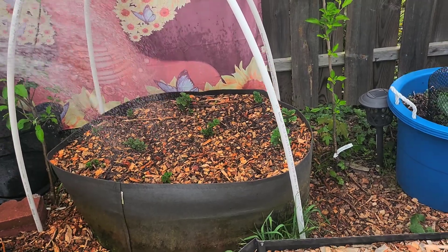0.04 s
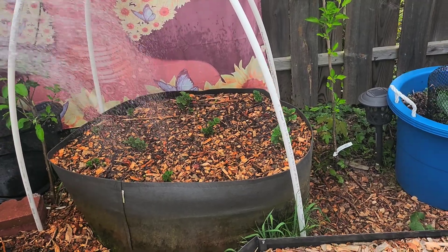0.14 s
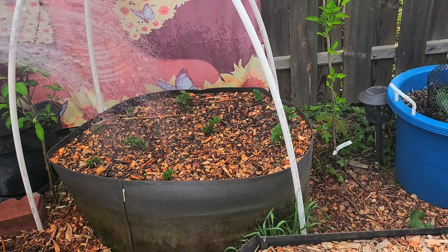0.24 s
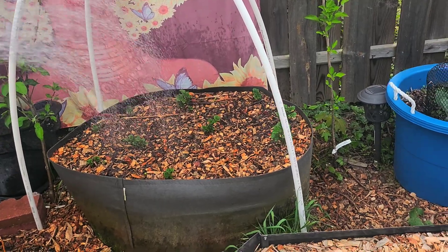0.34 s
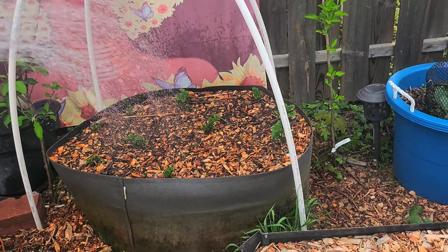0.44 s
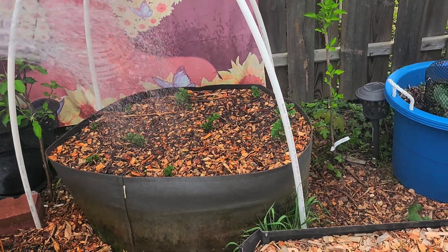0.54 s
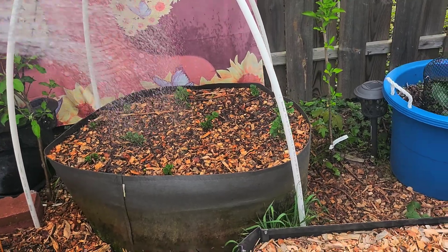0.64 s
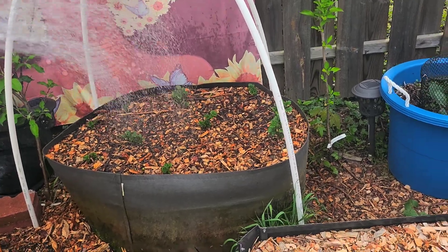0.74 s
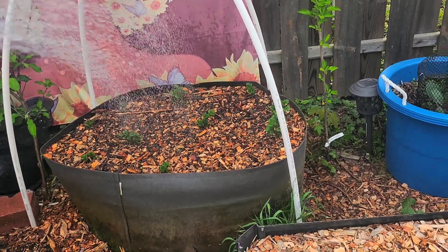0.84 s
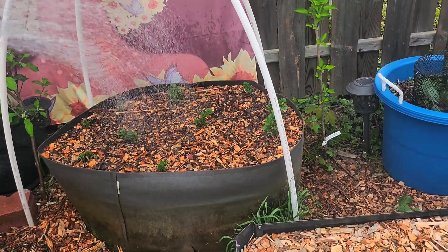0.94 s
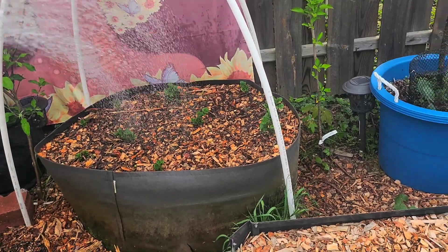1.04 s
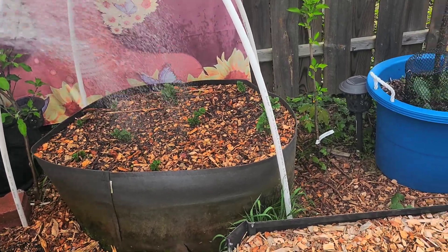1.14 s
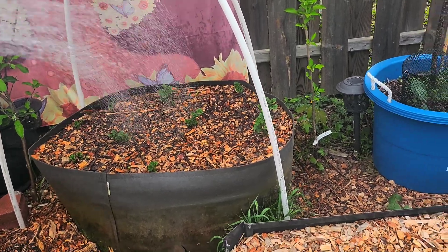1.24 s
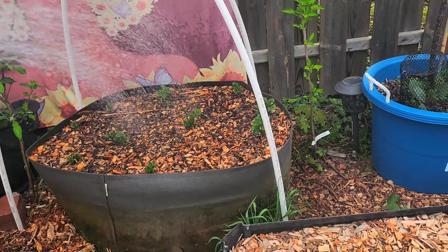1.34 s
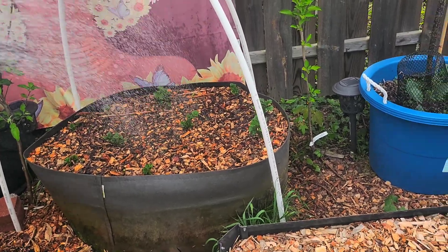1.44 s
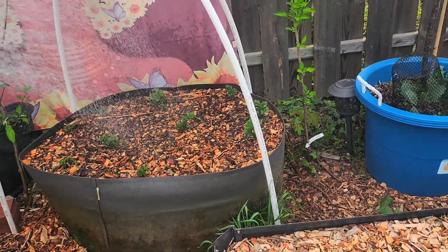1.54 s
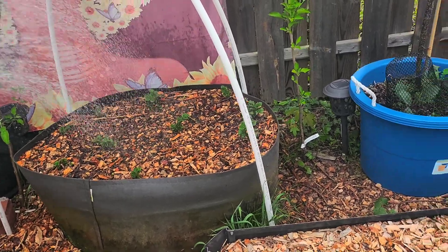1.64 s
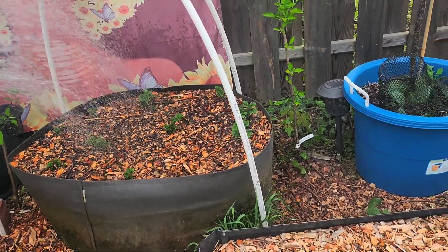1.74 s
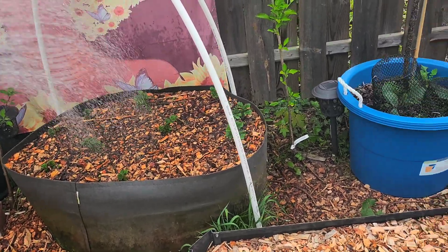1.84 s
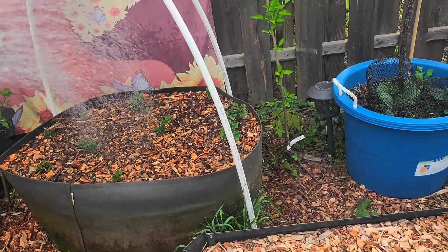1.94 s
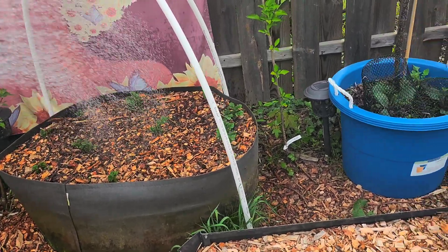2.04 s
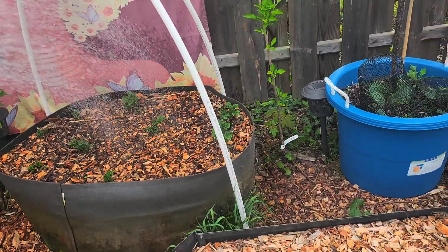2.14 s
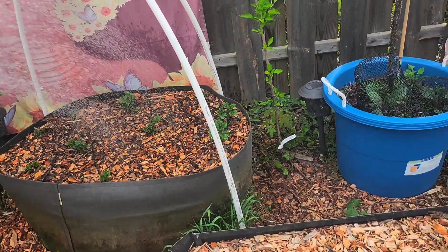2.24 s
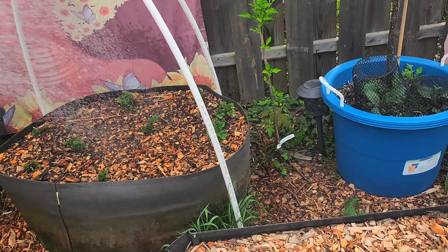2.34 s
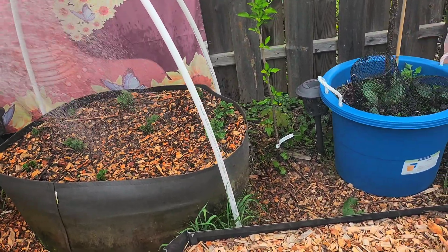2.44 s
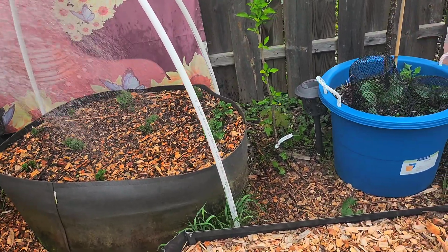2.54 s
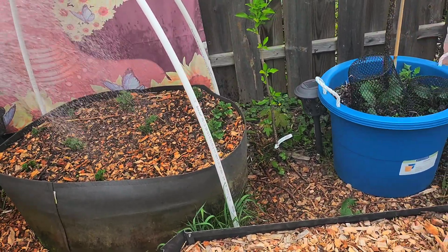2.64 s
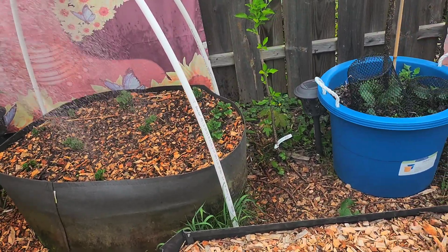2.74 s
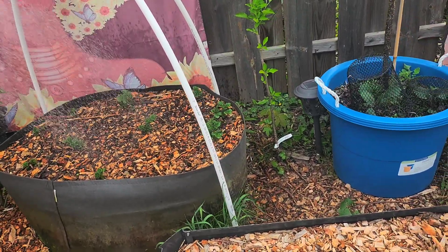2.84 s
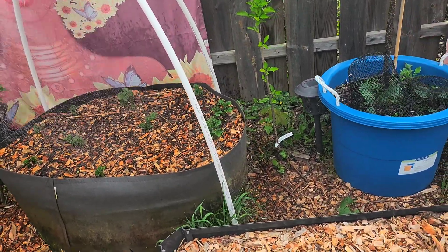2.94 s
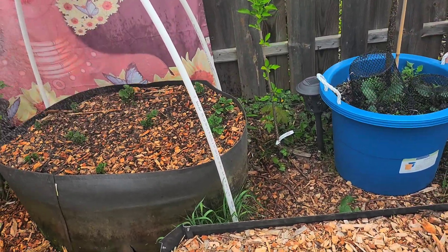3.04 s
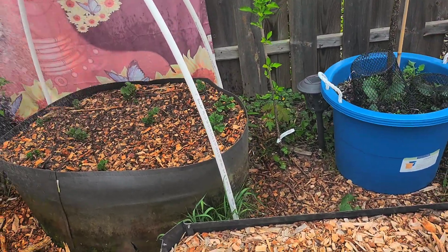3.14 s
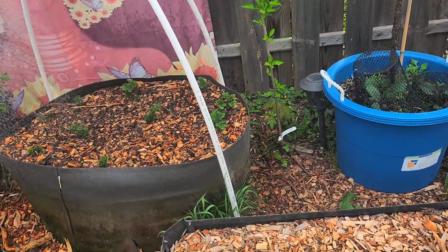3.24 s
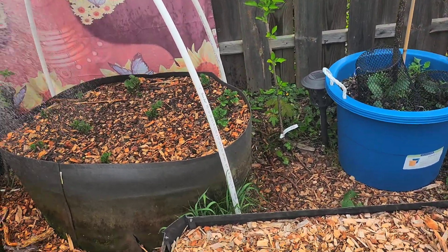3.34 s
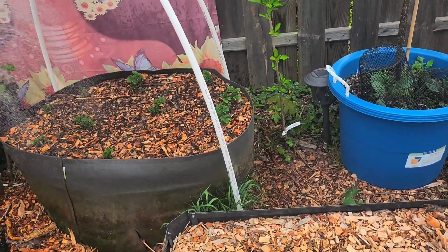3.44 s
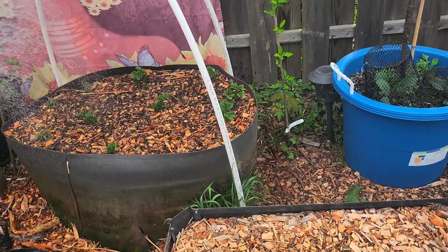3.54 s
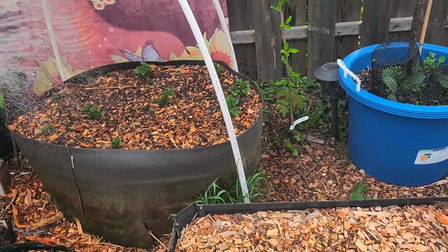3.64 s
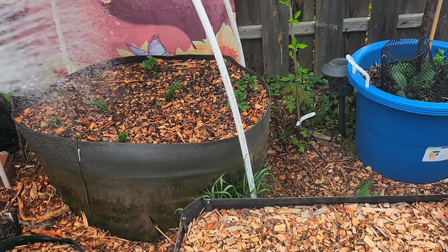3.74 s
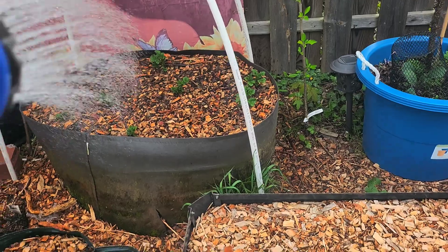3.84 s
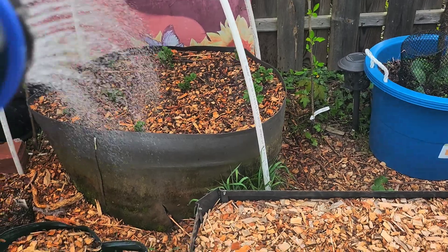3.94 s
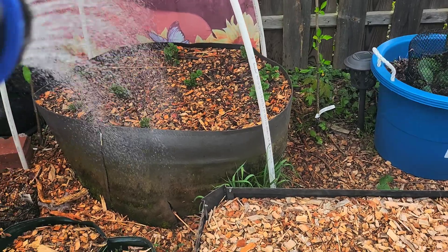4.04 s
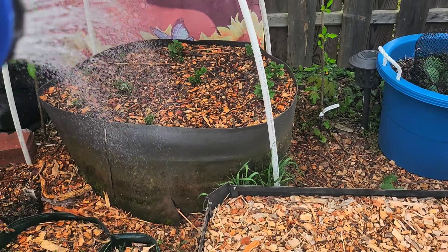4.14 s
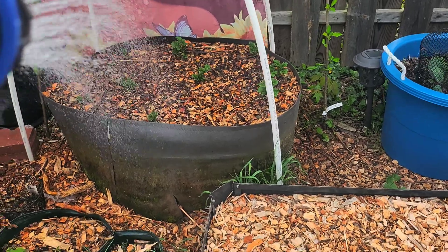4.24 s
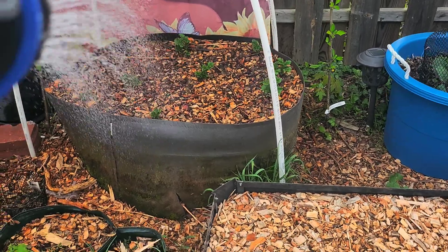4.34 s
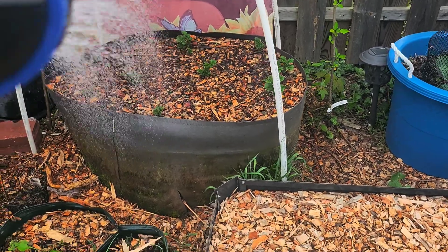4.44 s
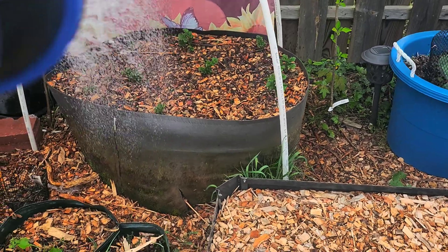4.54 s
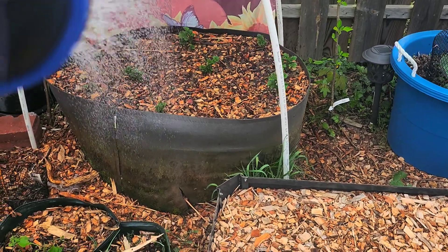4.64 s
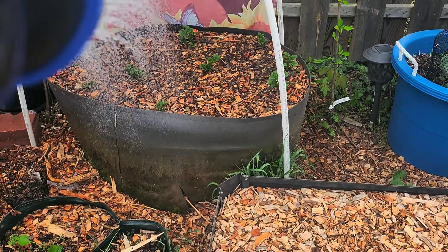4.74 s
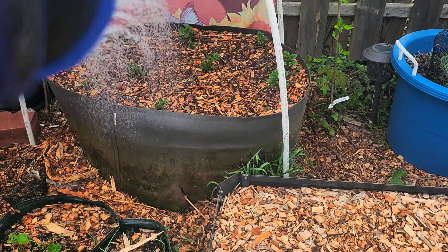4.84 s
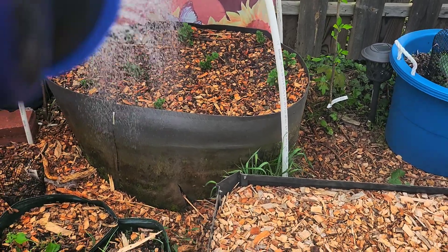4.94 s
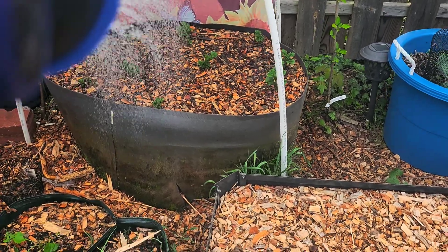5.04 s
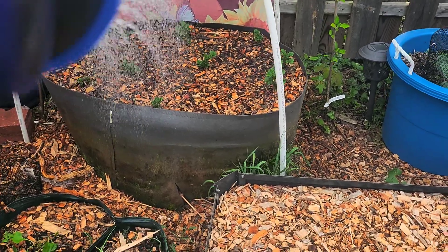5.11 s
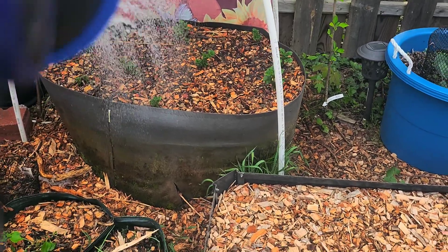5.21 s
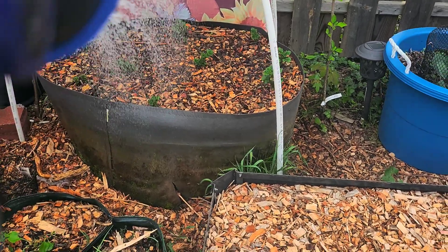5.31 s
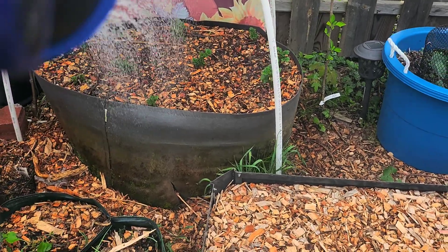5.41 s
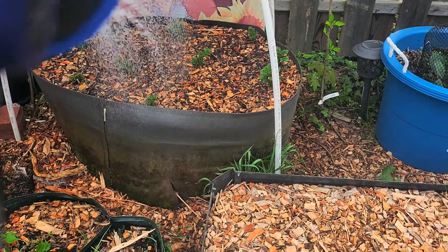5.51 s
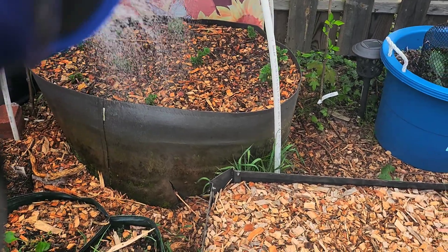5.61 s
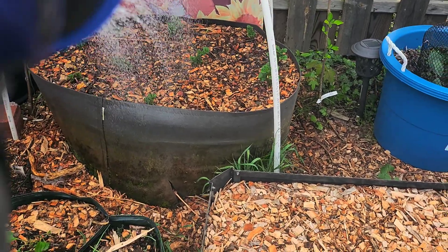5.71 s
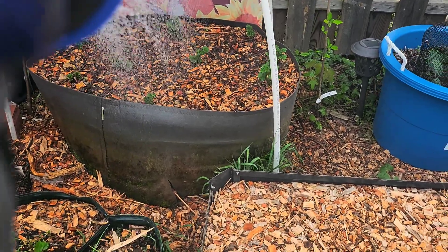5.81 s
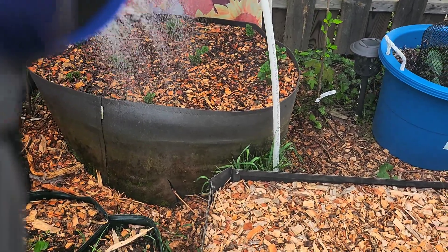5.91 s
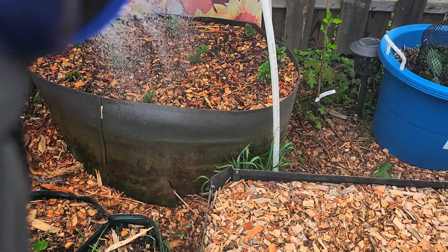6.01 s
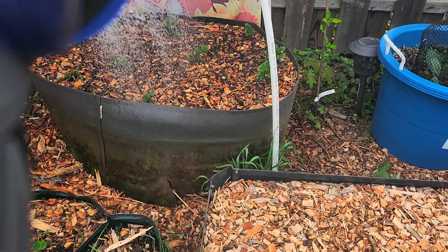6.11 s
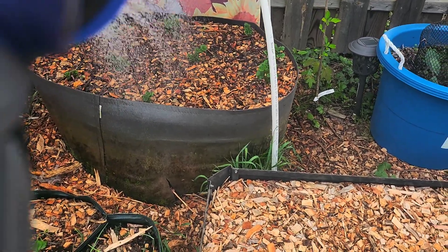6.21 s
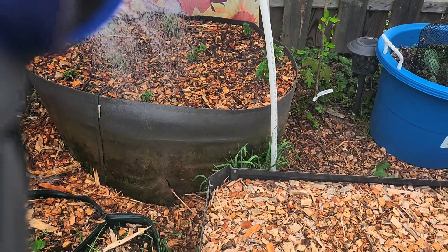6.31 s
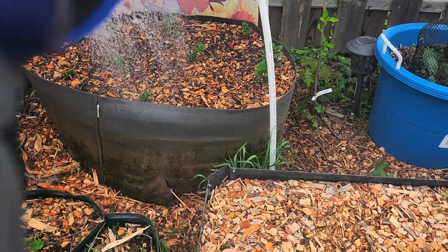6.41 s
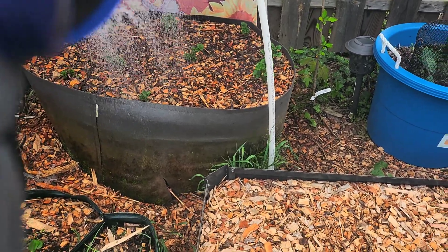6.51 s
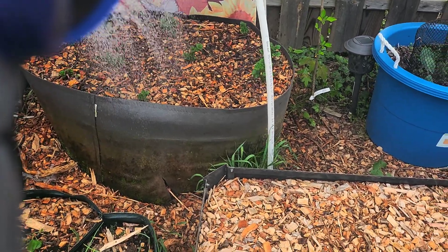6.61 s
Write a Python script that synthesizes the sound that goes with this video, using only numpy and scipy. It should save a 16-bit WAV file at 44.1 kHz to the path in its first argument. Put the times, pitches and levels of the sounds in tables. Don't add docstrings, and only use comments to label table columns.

```python
import sys
import numpy as np
from scipy import signal
from scipy.fft import rfft, irfft, next_fast_len
from scipy.io import wavfile
from scipy.ndimage import uniform_filter1d, map_coordinates

SR = 44100
rng = np.random.default_rng(int(sys.argv[2]) if len(sys.argv) > 2 else 0)


def store_pcm(level_fs):
    pcm = np.round(np.clip(level_fs, -1, 1) * 32767).astype(np.int16)
    wavfile.write(sys.argv[1], SR, np.atleast_2d(pcm).T)


def boost(x):
    u = np.asarray(x, float) / 20
    return 10 ** u


N = 294147

# time in seconds, level in dB.
JET_STRENGTH = [(0, -0.1), (.5, 0.34), (3, 0.05), (3.9, 0.8), (4.6, 0), (5.6, 0.6), (6, 0), (6.67, 2.5)]
# centre in seconds, change in dB.
TRIGGER_SLIPS = [
    (1.02, -0.7),
    (2.8, 0.6),
    (3.4, -0.5),
    (3.78, -0.5),
    (4.25, -.9),
    (6.35, -1.5),
]
# start in seconds, end in seconds.
HAND_MOVES = [
    (.35, 0.51),
    (1.1, 2.6),
    (2.62, 2.9),
    (3.66, 3.97),
    (4.25, 4.5),
]
# frequency in Hz, level in dB.
JET_COLOUR_LEFT = [(2500, -26.0), (3500, -32.0), (4500, -9.0), (6000, -5.0), (7500, 1.43), (9000, -3.5),
                   (11000, 4.5), (13000, -0.5), (14500, -3.5), (15700, 4.0)]
# frequency in Hz, level in dB.
JET_COLOUR_RIGHT = [(2500, -17.4), (3500, -15.0), (4500, -15.9), (6000, -19.5), (7500, -6.2), (9000, -17.4),
                    (11000, -13.9), (13000, -9.9), (14500, -12.9), (15700, -7.2)]
# delay in ms, pressure gain.
PATHS_TO_LEFT = [
    [(-0.011, 0.25), (0.0, 0.48), (0.079, 0.13), (0.181, -0.19), (0.324, 0.16), (0.377, 0.27),
     (0.619, 0.11), (0.666, 0.08)],
    [(0.0, 0.66), (0.037, -0.11), (0.192, -0.17), (0.335, 0.08), (0.396, 0.2), (0.816, 0.12),
     (1.015, -0.11), (1.203, 0.07)],
    [(0.0, 0.72), (0.071, 0.13), (0.183, -0.22), (0.287, -0.11), (0.44, -0.15), (0.547, 0.14), (0.618, 0.1),
     (0.707, -0.11)],
    [(0.0, 0.65), (0.057, 0.12), (0.136, 0.12), (0.365, -0.22), (0.684, 0.05), (0.777, -0.1),
     (0.895, -0.05), (0.997, 0.07)],
    [(0.0, 0.99), (0.035, 0.44), (0.086, 0.24), (0.158, -0.2), (0.311, 0.2), (0.388, -0.15), (0.618, -0.13),
     (0.827, 0.17)],
    [(0.0, 1.14), (0.144, -0.54), (0.29, 0.16), (0.384, -0.33), (0.436, -0.15), (0.661, 0.21),
     (0.697, 0.34), (1.165, 0.11)],
]
# delay in ms, pressure gain.
PATHS_TO_RIGHT = [
    [(0.282, -0.3), (0.411, -0.38), (0.509, 0.77), (0.595, -0.37), (0.668, -0.44), (0.858, 0.22),
     (0.987, 0.38), (1.057, 0.2), (1.51, 0.37), (1.747, 0.17)],
    [(0.271, -0.18), (0.349, 0.28), (0.442, -0.23), (0.56, -0.78), (0.605, -0.66), (0.672, -0.5),
     (0.706, 0.25), (0.808, -0.25), (1.025, -0.32), (1.086, -0.24)],
    [(0.246, 0.15), (0.296, -0.28), (0.361, 0.4), (0.485, 0.21), (0.521, 0.54), (0.636, 0.59),
     (0.648, -0.39), (0.76, -0.33), (0.812, -0.76), (1.024, -0.33)],
    [(0.071, 0.17), (0.117, 0.36), (0.361, 0.45), (0.439, -0.28), (0.517, 0.8), (0.604, 0.39),
     (0.718, 0.28), (0.876, -0.11), (0.993, -0.16), (1.531, 0.14)],
    [(-0.016, -0.28), (0.413, -0.43), (0.681, -0.13), (0.789, -0.06), (1.015, 0.39), (1.156, -0.42),
     (1.243, -0.22), (1.424, -0.43), (1.704, 0.45), (2.393, 0.19)],
    [(0.45, -0.3), (0.526, 0.2), (0.71, 0.23), (0.824, 0.22), (0.889, -0.16), (1.038, 0.28), (1.211, 0.39),
     (1.269, 0.4), (1.456, 0.16), (1.546, 0.2)],
]
# frequency in Hz, level in dB.
MIST_COLOUR = [(2500, -30), (3500, -10), (4400, 3), (5100, -5), (6000, -6), (7500, 0), (9000, -3),
               (13000, -3), (15700, 0)]
# time in seconds, level in dB.
PATTER_LEVEL = [(0, -57), (.67, -58), (1.37, -54.5), (1.8, -57), (3.2, -58), (4, -53.5), (4.4, -56),
                (4.83, -54.5), (6.67, -55)]
# frequency in Hz, level in dB.
MULCH_COLOUR = [(260, -36), (450, 3.5), (640, -5), (950, -0.5), (1280, 1), (1600, 1), (1950, 3), (2300, -2),
                (2650, -6.5), (3080, -2), (3400, -15), (4200, -3.5), (6000, -94)]
# frequency in Hz, lag in radians.
PORT_LAG = [(100, .15), (500, .8), (1000, 2), (1650, 3.2), (2100, 6), (3300, 6.8)]
# time in seconds, level in dB.
TUB_SPLASH = [(0, -68), (3.8, -80), (4.05, -60.5), (4.7, -64), (5.2, -63), (5.6, -81), (6.67, -78)]
# start in seconds, peak in dB, ring in Hz, ring time in seconds, thump in dB.
GRIP_TICKS = [
    (.832, -46, 1810, 0.018, -20),
    (1.180, -37, 1190, 0.016, -20),
    (1.2224, -23, 1360, 0.0021, -5),
    (1.297, -34, 517, 0.014, -17),
    (1.309, -33, 666, 0.011, -1),
    (1.37, -36.5, 900, 0.0085, -10),
    (1.39, -54, 1880, 0.012, -20),
    (1.543, -35, 497, 0.0088, -16),
]
# start in seconds, length in seconds, pitch in Hz, level in dB.
WHISTLES = [
    (2.855, .15, 3170, -56),
    (2.99, .06, 2960, -61),
    (3.81, .17, 3150, -57),
    (5.215, .15, 3210, -55),
    (6.05, .19, 3130, -55),
]
# time in seconds, level in dB.
ENGINE_LEVEL = [(0, -53), (.4, -50), (1.5, -52), (2.1, -50.5), (2.8, -70), (6.67, -68)]
# centre in seconds, rise in dB.
HUM_SWELLS = [(.24, 25), (.89, 17), (1.71, 24), (2.4, 8), (2.62, 23), (2.92, 24), (3.68, 24), (4.5, 13),
              (4.94, 24), (5.44, 28.5), (6.05, 20), (6.25, 18.5), (6.61, 23.5)]
# time in seconds, level in dB.
TRAFFIC_LEVEL = [(0, -44.5), (2.9, -44), (6.67, -46.5)]
# frequency in Hz, level in dB.
RUMBLE_COLOUR = [(15, -74), (25, -42), (29, -40), (36, -18.5), (60, 0.5), (87, -7), (114, -5.5),
                 (163, -12.5), (210, -10), (292, -18.5), (452, -23), (609, -32.5), (900, -30), (1170, -52),
                 (1980, -120)]
# frequency in Hz, likeness of left and right from 0 to 1.
PORT_LIKENESS = [(60, 0.95), (250, 0.93), (500, 0.61), (900, 0.2)]


def nozzle_jet():
    tearing = patchy(channels=1, patchy_db=0.77)[0] + 0.5 * drops(rate=4000, spread_db=1.3)
    flutter_db = .15 * wobble(12) + .35 * wobble(45) + .6 * wobble(170)
    tearing = unit(tearing * boost(flutter_db))
    right_only = patchy(channels=1, patchy_db=1.4)[0]

    def colour(hz):
        lowest_hiss = 1 + (3100 / (hz + 1)) ** 14
        return boost([along(JET_COLOUR_LEFT, hz), along(JET_COLOUR_RIGHT, hz)]) / lowest_hiss

    left, right = filtered(np.array([tearing, .85 * tearing + .55 * right_only]), colour)
    t = np.arange(N) / SR
    position = sum(np.clip((t - start) / (end - start), 0, 1) for start, end in HAND_MOVES)
    sound = np.zeros((2, N))
    for k, (near, far) in enumerate(zip(PATHS_TO_LEFT, PATHS_TO_RIGHT)):
        presence = np.clip(1 - abs(position - k), 0, 1)
        sound += presence * np.array([along_paths(left, near), along_paths(right, far)])
    jet_db = curve(JET_STRENGTH) + bumps(TRIGGER_SLIPS, half_s=0.067)
    return boost(jet_db - 26) * sound


def mist():
    return boost(-58.5) * unit(filtered(patchy(channels=2, patchy_db=1.5), lambda hz: boost(along(MIST_COLOUR, hz))))


def patter():
    impacts = patchy(channels=1, patchy_db=2.5) + 0.35 * drops(rate=900, spread_db=1.0)

    def lag(hz):
        return np.exp(-1j * along(PORT_LAG, hz) * np.array([[0], [1]]))

    mix = filtered(impacts, lag) + 0.8 * patchy(channels=2, patchy_db=3)
    on_mulch = unit(filtered(mix, lambda hz: boost(along(MULCH_COLOUR, hz))))
    return boost(curve(PATTER_LEVEL) + 0.5 + 0.1 * wobble(22.0)) * on_mulch


def tub_splash():
    return boost(curve(TUB_SPLASH)) * narrow(hz=780, width=200)


def grip():
    out = np.zeros((2, N))
    t = np.arange(SR // 20) / SR
    for s, db, hz, ring_s, thump_db in GRIP_TICKS:
        body = -boost(-60 * t / ring_s) * np.sin(2 * np.pi * hz * t)
        snap = -.45 * boost(-60 * t / 0.003) * np.sin(2 * np.pi * 3100 * t)
        thump = boost(thump_db - 60 * t / 0.015) * np.sin(2 * np.pi * 280 * t)
        rightward_db = 8.5 * hz / 1000
        sides = boost(rightward_db * np.array([[-.5], [.5]]))
        start = round(s * SR)
        out[:, start:start + len(t)] += boost(db - 1.5) * (sides * (body + snap) + thump)
    return out


def bird():
    out = np.zeros(N)
    for s, length, hz, db in WHISTLES:
        u = np.arange(int(length * SR)) / (length * SR)
        phase = 2 * np.pi * np.cumsum(hz * (1 - 0.0234 * u)) / SR
        trill_db = 4 * np.sin(2 * np.pi * 17 * length * u)
        swell = np.sin(np.pi * u) ** .5
        out[round(s * SR):][:len(u)] += boost(db - 3.5 + trill_db) * swell * np.sin(phase)
    return out * np.array([boost(-6 + 3 * wobble(70)), boost(3 + 3 * wobble(70))])


def car_engine():
    return boost(curve(ENGINE_LEVEL)) * (narrow(hz=90.0, width=7.1) + 0.71 * narrow(hz=182.1, width=13.0))


def fan_hum():
    return boost(-58 - 9.5 + bumps(HUM_SWELLS, half_s=0.12)) * narrow(hz=58.7, width=5.2)


def traffic():
    def mid_and_side(hz):
        turn = np.arccos(np.clip(along(PORT_LIKENESS, hz), -1, 1)) / 2
        return boost(along(RUMBLE_COLOUR, hz)) * [np.cos(turn), np.sin(turn)]

    mid, side = filtered(rng.standard_normal((2, N)), mid_and_side)
    return boost(curve(TRAFFIC_LEVEL) + 0.27 * wobble(5.06)) * unit(np.array([mid + side, mid - side]))


def town():
    return boost([[-.3], [.3]]) * (car_engine() + fan_hum() + traffic())


def along_paths(x, paths):
    ms, gain = np.transpose(paths)
    offset = np.arange(-16, 160)[:, None] - ms * SR / 1000
    taps = (np.sinc(offset) * np.exp(-(offset / 7) ** 2)) @ gain
    return signal.oaconvolve(x, taps)[:N]


def patchy(channels, patchy_db):
    z = signal.stft(rng.standard_normal((channels, N)), nperseg=256)[2]
    field = uniform_filter1d(rng.standard_normal(z.shape[1:]), size=8, axis=0)
    field = unit(uniform_filter1d(field, size=8, axis=1))
    return unit(signal.istft(z * boost(patchy_db * field), nperseg=256)[1][:, :N])


def drops(rate, spread_db):
    hits = rng.random(N) < rate / SR
    return unit(hits * rng.standard_normal(N) * boost(spread_db * rng.exponential(1, N)))


def narrow(hz, width):
    return unit(filtered(rng.standard_normal(N), lambda f: 1 / (1 + ((f - hz) / width) ** 2)))


def filtered(x, response):
    m = next_fast_len(N + 8192)
    return irfft(rfft(x, m) * response(np.fft.rfftfreq(m, 1 / SR)), m)[..., :N]


def wobble(rate):
    return map_coordinates(rng.standard_normal(int(N * rate / SR) + 4), [np.arange(N) * rate / SR])


def bumps(rows, half_s):
    t = np.arange(N) / SR
    return sum(db * np.exp(-((t - s) / half_s) ** 2) for s, db in rows)


def curve(rows):
    s, value = np.transpose(rows)
    return np.interp(np.arange(N) / SR, s, value)


def along(points, hz):
    f, v = np.transpose(points)
    return np.interp(np.log(hz + 1), np.log(f + 1), v)


def unit(x):
    return x / np.sqrt(np.mean(x ** 2) + 1e-20)


def scene():
    return nozzle_jet() + mist() + patter() + tub_splash() + grip() + bird() + town()


def low_pass(x):
    return signal.sosfilt(signal.butter(12, 17110, fs=SR, output="sos"), x)


def record(dry):
    mix = filtered(dry, lambda hz: hz < 15760)
    return low_pass(mix)


dry = scene()
out = record(dry)
store_pcm(out)
```